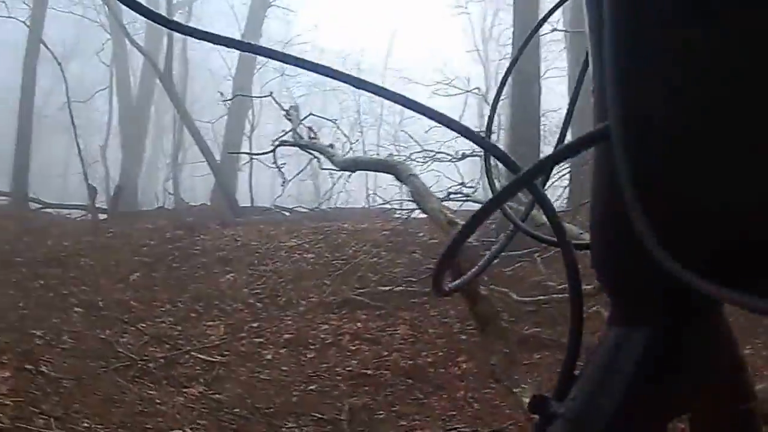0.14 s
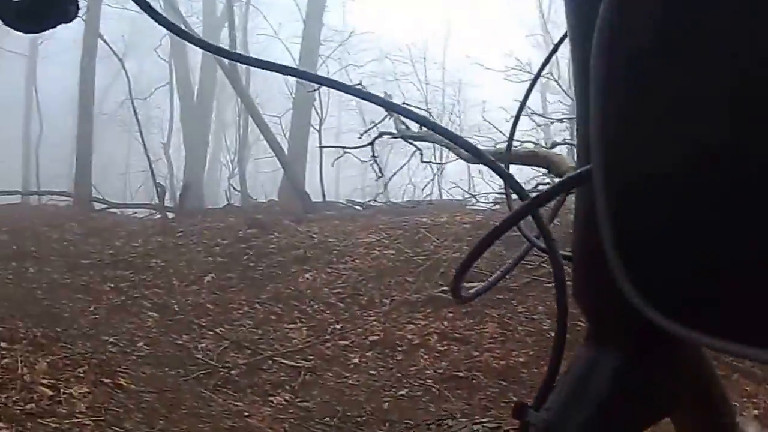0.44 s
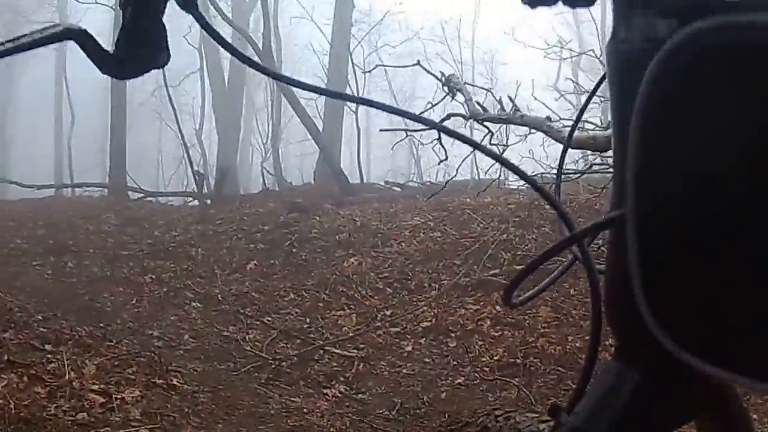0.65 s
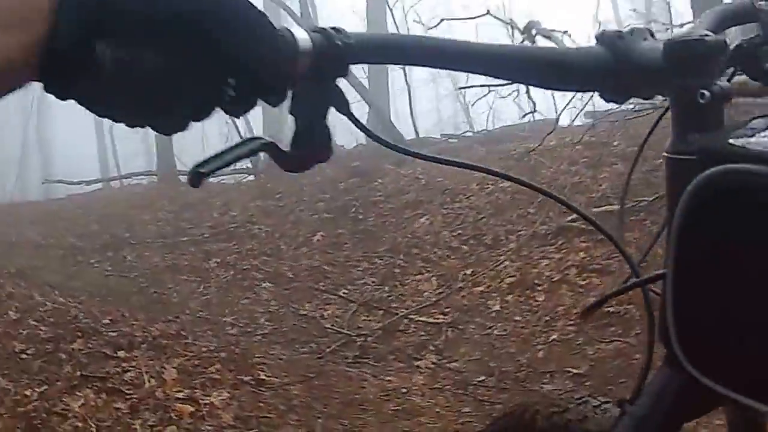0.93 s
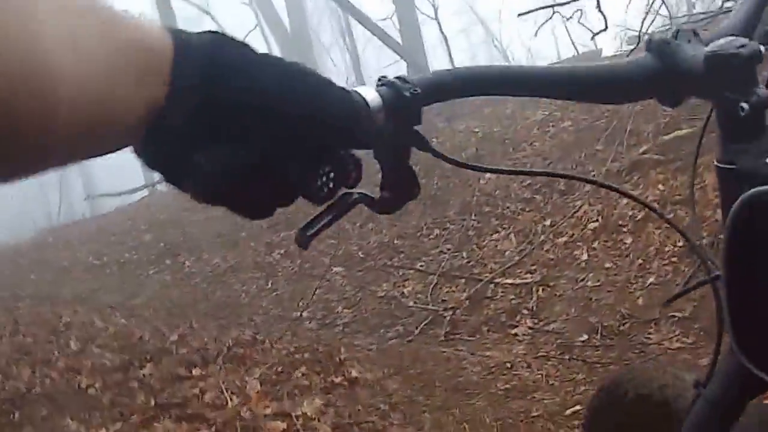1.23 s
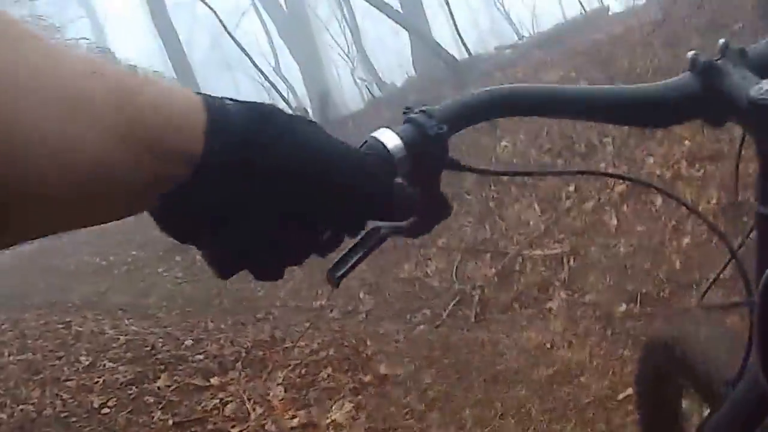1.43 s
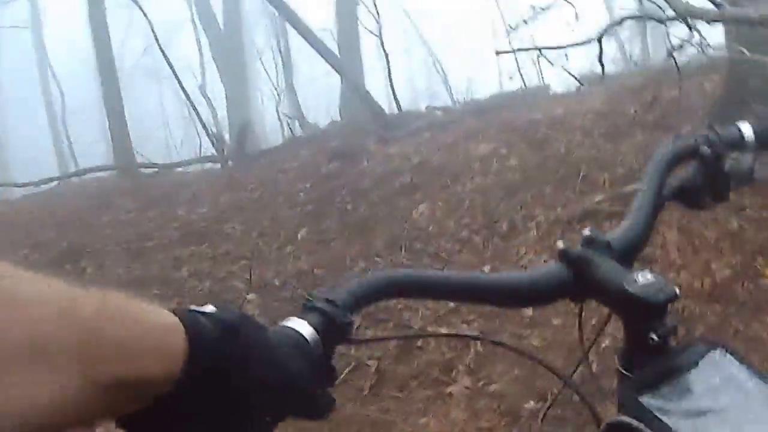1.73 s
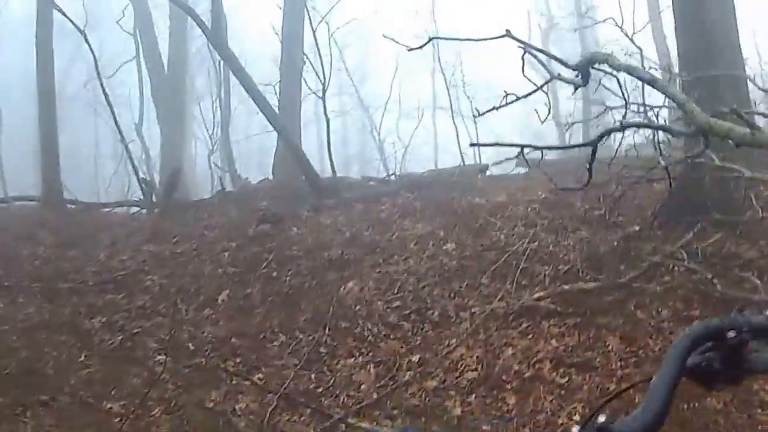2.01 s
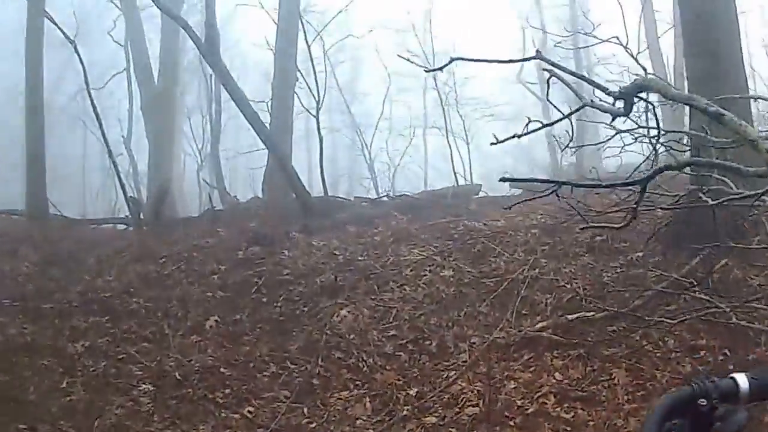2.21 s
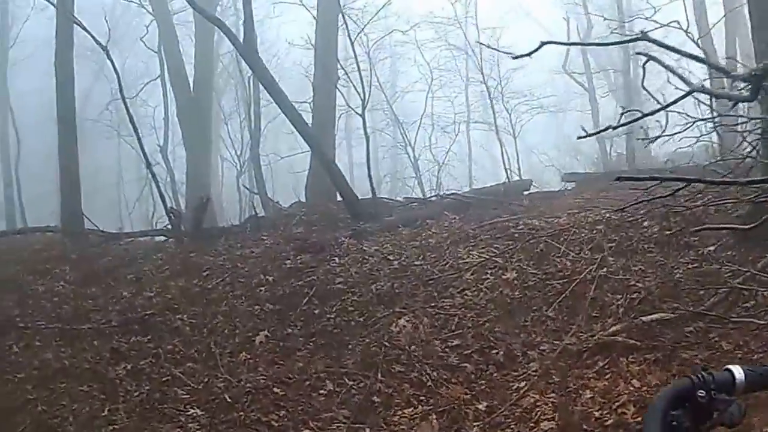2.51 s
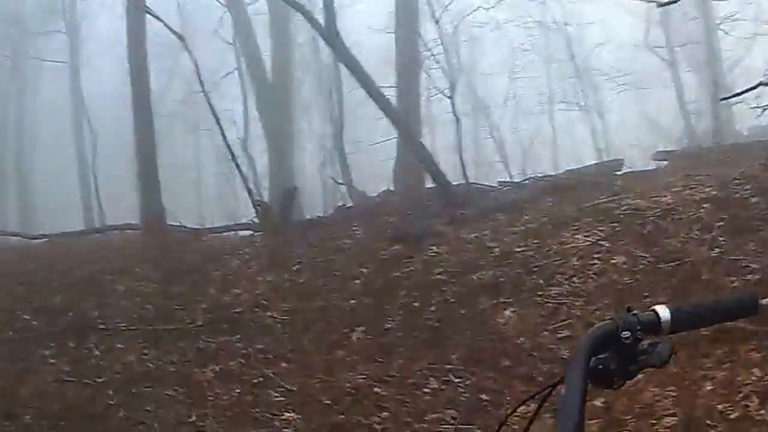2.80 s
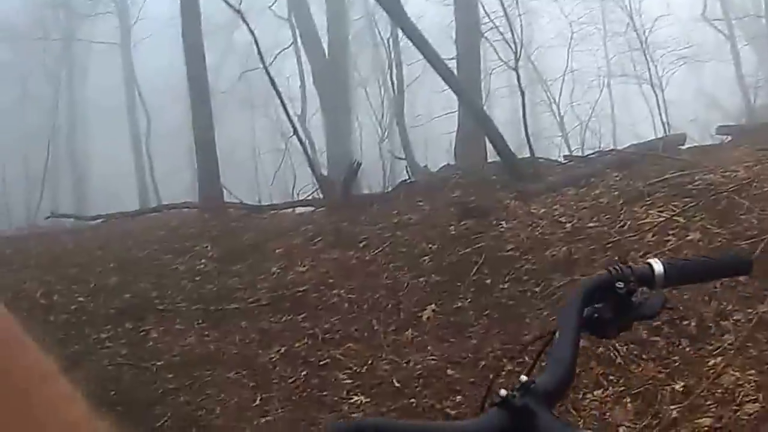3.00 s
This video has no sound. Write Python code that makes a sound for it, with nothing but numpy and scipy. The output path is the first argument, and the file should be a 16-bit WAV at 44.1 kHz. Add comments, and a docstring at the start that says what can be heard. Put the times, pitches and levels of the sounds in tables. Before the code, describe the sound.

Bike knocks heard through a sealed camera housing: loud opening clatter, quiet rustle, few later clacks

```python
"""Mountain bike ride heard inside a sealed housing

A small camera in a sealed plastic housing rides with a mountain bike through a leafy forest.
Knocks and a dense rustle of tyres, leaves and clothing ring the few short modes of the housing, which dulls them.
Knocks also add low thumps and bright noise cracks; band noise makes faint squeaks.
Low-passed noise makes the rumble of wind and hard jolts, shaped noise the thin microphone hiss."""
import sys
import numpy as np
from scipy import signal
from scipy.fft import rfft, irfft
from scipy.io import wavfile
from scipy.ndimage import uniform_filter1d, minimum_filter1d

SR = 44100
rng = np.random.default_rng(int(sys.argv[2]) if len(sys.argv) > 2 else 0)


def wrap_up_sound(samples):
    """Save the sound to the file named by the first command line argument, as 16-bit audio."""
    columns = np.atleast_2d(samples).T
    # keep every value between -1 and 1, then stretch to whole-number steps
    tamed = np.clip(columns, -1, 1)
    steps = np.round(tamed * 32767).astype(np.int16)
    wavfile.write(sys.argv[1], SR, steps)


N = 138915

# housing modes, four families: pitch_hz, level_db, t60_s
BODY_MODES = [(426, 5, 0.0064), (540, 0, 0.0089), (667, 3, 0.019)]
LOW_MODES = [(982, -10.5, 0.021), (1352.5, 14, 0.03), (1460, 12, 0.018)]
MID_MODES = [(1908, 0, 0.024), (2018, 0, 0.022), (2154, -3, 0.014)]
HIGH_MODES = [(2640, -1.5, 0.01), (2880, -5.5, .04), (3160, 2.5, 0.0086), (3890, -15, 0.0084),
              (4720, -17, 0.00712)]
# pass bands of the mid, low, high and body families: bottom_hz, top_hz
FAMILY_BANDS_HZ = [(1420, 2513), (970, 2000), (2580, 5200), (250, 1010)]
# knocks: start_s, mid_peak_db, lean_db (added to top mid mode re bottom one),
# low_re_mid_db, high_re_mid_db, body_re_mid_db, chatter_s
KNOCKS = [(0.0196, -14.5, -28, 1, -38, -25.5, 0.0012), (0.0312, -22.5, -19, -3, -28, -36, 0.0018),
          (0.045, -23.5, 3, -2, -12, -32, 0.0097), (0.0562, -41.5, -13, -3, -7, 6, 0.0087),
          (0.0663, -16, 14, -2.5, 11, -1.5, 0.0038), (0.0685, -4, -22.5, -3.5, -12, -19, 0.0028),
          (0.0779, -17.5, -14, 2, -9.5, -29, 0.002), (0.0791, -9.5, -26, -16, -25, -37, 0.0017),
          (0.098, -31.5, 0, 7.5, -8.5, -33, 0.00135), (0.1027, -33, 12.5, 1, -17, -26, 0.001),
          (0.119, -43.5, -5, 4, -10, -28, 0.0035), (0.138, -31, 10, -0.5, -8, -34, 0.007),
          (0.2001, -34.5, 3, -6, -11, -25, 0.0017), (0.378, -40.5, -11, -9, -20, -37, 0.0014),
          (0.7007, -39.5, 23, -14, -10, -37.5, 0.0011), (0.7615, -31, 7, -18, -11, -40.5, 0.0042),
          (0.7871, -45.5, 23, -10, -12, -32.5, 0.0017), (0.9207, -38, -1, -9, -9.5, -33, 0.0012),
          (0.9494, -41, 16, -8, -11, -46, 0.0017), (0.964, -35.5, -14, -10, -12.5, -44, 0.0015),
          (0.989, -37.5, -8, -13, -8.5, -36, 0.0015), (1.128, -50.5, -14.5, -0.5, -2, -25, 0.0014),
          (1.2131, -43, -16, -2, -4, -28, 0.0048), (1.2501, -42, -16, -9.5, -11.5, -23, 0.0017),
          (1.5844, -40.5, -3, -14, -22.5, -27, 0.005), (1.6932, -37, 7, -39, -12, -25, 0.012),
          (1.7056, -36.5, -25, -11.5, -10, -37, 0.0055), (1.8135, -42.5, -4.5, -23.5, -18, -24, 0.0012),
          (1.8251, -39, 1.5, -17.5, -14, -28.5, 0.0022), (1.999, -19.5, -7.5, -4.5, -37, -43, 0.00031),
          (2.0765, -16.5, 3, -5.5, -32.5, -45.5, 0.00031), (2.9624, -48, 12, 2, -5.5, -4.5, 0.00097),
          (2.9701, -36.5, 15.5, -14.5, -4, -27.5, 0.004), (2.974, -22, 6.5, -15.5, -4, -44.5, 0.0054),
          (2.9767, -14, 5, -14.5, -5.5, -52, 0.002), (2.9809, -26, 7, -13.5, -4, -42, 0.0031),
          (2.986, -25, 5.5, -19.5, -12.5, -31.5, 0.0053), (3.0151, -45, 16, -12.5, -16.5, -35, 0.0015),
          (3.109, -46, 14, -21, -2.5, -30, 0.0012)]
# rustle: time_s, mid_level_db, low_re_mid_db, high_re_mid_db, body_re_mid_db
RUSTLE = [(0.0, -28, -6, -16.5, -33.5), (0.046, -39.5, 12, -12.5, -31), (0.074, -40.5, -3, -13, -23),
          (0.114, -51, -4.5, -9, -21), (0.142, -48.5, -4, -4, -18.5), (0.174, -59, -9, -9, -21),
          (0.231, -56, 2.5, -3, -22), (0.325, -49, -11, -9, -18.5), (0.347, -44.5, -9, -11.5, -17),
          (0.397, -58.5, -1, -7.5, -19), (0.539, -59, -8, -4.5, -16), (0.593, -64.5, -2, -2, -16.5),
          (0.643, -58, -3, -5, -21), (0.77, -58, -5, -7, -30.5), (0.854, -63, -5, -5, -18.5),
          (0.966, -56.5, -7.5, -8, -23), (1.068, -58, -12, -7, -21.5), (1.109, -64, 0, -4.5, -19),
          (1.199, -52.5, -8, -6.5, -22), (1.257, -51, -6.5, -14.5, -30), (1.341, -57, -8.5, -5, -20.5),
          (1.423, -48, -11, -9.5, -22), (1.515, -60.5, -8.5, -7, -22), (1.58, -49, -18, -7, -27),
          (1.63, -57, -4.5, -9.5, -23), (1.704, -46.5, -7, -4, -25), (1.76, -56.5, -10.5, -8, -20),
          (1.818, -42, -15.5, -8, -29.5), (1.836, -43.5, -26, -9, -34.5), (1.86, -63.5, -3, -5, -17.5),
          (1.88, -60.5, -8, -6, -21.5), (1.924, -56.5, -5.5, -9, -23), (2.031, -61, -9.5, -4, -16),
          (2.081, -54, -11, -9, -21), (2.163, -64.5, -6.5, -4, -20), (2.343, -62, -6.5, -6.5, -21),
          (2.411, -57, -9.5, -9.5, -22.5), (2.48, -61.5, -8, -7, -21.5), (2.616, -62.5, -8, -6, -22.5),
          (2.666, -57, -14, -6.5, -23.5), (2.734, -66.5, -5, -0.5, -21), (2.804, -62.5, -8, -4, -19.5),
          (2.935, -64, -5.5, -5.5, -22.5), (2.957, -60.5, -9, -5, -23.5), (2.983, -60, -2, -9, -30),
          (3.017, -61, -8.5, -8, -22), (3.149, -64, -4.5, -4, -21)]
# faint squeaks: start_s
SQUEAK_STARTS_S = [.731, .745, .781, .803, .817]
# low rumble of wind and hard jolts: time_s, level_db
RUMBLE_LEVELS = [(0.0, -62), (0.03, -84), (0.06, -54), (0.07, -45), (0.11, -71.5), (0.28, -86),
                 (0.42, -73.5), (0.84, -82), (1.35, -79), (1.41, -70), (1.53, -89), (1.58, -69.5),
                 (1.63, -90), (1.68, -67.5), (1.77, -79), (1.83, -82.5), (2.46, -84), (2.52, -97),
                 (2.56, -70), (2.59, -92.5), (2.95, -90.5), (3.15, -92.5)]
# microphone hiss spectrum: pitch_hz, density_db (per Hz, relative)
HISS_SPECTRUM = [(100, -7.5), (400, -9.5), (1000, -8.5), (5000, -5.5), (6500, -10.5), (8000, -24.5),
                 (9300, -1.5), (11000, 2), (13500, 2), (15000, -6.5)]

HOUSING_CUT_HZ = 4790
HIGH_LEAN_SHARE = 0.7
CHATTER_GAIN, FAMILY_SCATTER_DB = 0.07, 0.7  # chatter re a first push of 1
THUMP_DB, THUMP_HZ, THUMP_T60_S, THUMP_POWER = -3.5, 103, 0.0091, 1.455
CRACK_DB, CRACK_POWER, CRACK_HIGHPASS_HZ, CRACK_LOWPASS_HZ = -22.5, 1.5, 9300, 11250
LEAK_DB, LEAK_BAND_HZ = -9, (4800, 7000)  # share of the crack below the treble dip
RUSTLE_DAMPING, RUSTLE_CUT_HZ = 1.5, 4200
GRAINS_PER_S, GRAIN_SPREAD_DB = 7000, 1.5
SHARED_FLICKER_DB, OWN_FLICKER_DB, FLICKER_PER_S = 0.5, 1.5, 70
SQUEAK_BAND_HZ, SQUEAK_S, SQUEAK_DB = (4020, 4300), 0.009, -67
RUMBLE_HZ, RUMBLE_FLICKER_DB, RUMBLE_FLICKER_PER_S = 38.07, 5, 13
HISS_DB = -84.5
LIMIT_DB, LIMIT_S = -3.3, 0.0011
TOP_HZ = 15750


def undb(db):
    """Amplitude of a level in dB."""
    return 10 ** (np.asarray(db) / 20)


def unit(x):
    """Scale to RMS 1."""
    return x / np.sqrt(np.mean(x ** 2))


def peak_unit(x):
    """Scale to peak 1."""
    return x / np.abs(x).max()


def filt(x, hz, kind, order):
    """Butterworth filter."""
    return signal.sosfilt(signal.butter(order, hz, kind, fs=SR, output="sos"), x)


def walk(rate_per_s):
    """Random levels, each held 1 / rate_per_s and slewed; RMS 1."""
    hold = int(SR / rate_per_s)
    steps = np.repeat(rng.standard_normal(N // hold + 1), hold)
    return unit(uniform_filter1d(steps, hold)[:N])


def curve(table, column):
    """Table column interpolated over the scene."""
    rows = np.array(table)
    return np.interp(np.arange(N) / SR, rows[:, 0], rows[:, column])


def ring(modes, damping=1):
    """Click response of a family: decaying sines, t60 divided by damping."""
    t_s = np.arange(SR // 16) / SR
    response = 0
    for hz, db, t60_s in modes:
        decay = np.exp(-np.log(1000) * damping * t_s / t60_s)
        response = response + undb(db) * np.sin(2 * np.pi * hz * t_s) * decay
    return response


def housing_families(damping=1, lean_db=0):
    """Click responses of mid, low, high and body modes, band-limited; lean tilts mid and high."""
    mid_lean = (-0.5, 0, 0.5)
    high_lean = HIGH_LEAN_SHARE * np.array((0, -0.91, 0.5, 0, 0))
    mid = [(hz, db + k * lean_db, t60_s) for k, (hz, db, t60_s) in zip(mid_lean, MID_MODES)]
    high = [(hz, db + k * lean_db, t60_s) for k, (hz, db, t60_s) in zip(high_lean, HIGH_MODES)]
    families = (mid, LOW_MODES, high, BODY_MODES)
    return [filt(ring(modes, damping), band_hz, "band", order=3)
            for modes, band_hz in zip(families, FAMILY_BANDS_HZ)]


def knocks():
    """Blow plus short chatter rings the modes; thump and noise crack grow faster than the knock."""
    thump = -ring([(THUMP_HZ, 0, THUMP_T60_S)])
    t_s = np.arange(SR // 40) / SR
    ringing, crack = np.zeros(N + SR), np.zeros(N + SR)
    for start_s, mid_db, lean_db, low_db, high_db, body_db, chatter_s in KNOCKS:
        start = int(start_s * SR)
        scatter_db = FAMILY_SCATTER_DB * rng.standard_normal(5)
        hold = 1 / (1 + (t_s / max(chatter_s, 1 / SR)) ** 4)
        chatter = rng.standard_normal(len(t_s)) * hold
        push = CHATTER_GAIN * chatter
        push[0] = 1  # the blow
        thump_db = THUMP_DB + THUMP_POWER * (mid_db + body_db)
        levels_db = np.array([mid_db, mid_db + low_db, mid_db + high_db, mid_db + body_db, thump_db])
        gains = undb(levels_db + scatter_db)
        responses = housing_families(lean_db=lean_db) + [thump]
        sound = sum(gain * peak_unit(signal.fftconvolve(push, response))
                    for gain, response in zip(gains, responses))
        ringing[start:start + len(sound)] += sound
        crack[start:start + len(t_s)] += chatter * undb(CRACK_DB + CRACK_POWER * (mid_db + high_db))
    return ringing[:N], crack[:N]


def rustle():
    """Dense grains of uneven size ring the same modes, damped by the touch."""
    out = 0
    shared_flicker = SHARED_FLICKER_DB * walk(FLICKER_PER_S)
    hit = rng.random(N) < GRAINS_PER_S / SR
    size = hit * undb(GRAIN_SPREAD_DB * rng.exponential(size=N))
    for family, response in enumerate(housing_families(RUSTLE_DAMPING)):
        grains = signal.fftconvolve(size * rng.standard_normal(N), response)[:N]
        level_db = curve(RUSTLE, 1) + shared_flicker
        if family > 0:  # the others are relative to mid
            level_db = level_db + curve(RUSTLE, family + 1)
        level_db = level_db + OWN_FLICKER_DB * walk(FLICKER_PER_S / 2)
        out = out + undb(level_db) * unit(grains)
    return filt(out, RUSTLE_CUT_HZ, "low", order=3)


def squeaks():
    """Short breathy whistles of rubbing: narrow-band noise in bell-shaped bursts."""
    t_s = np.arange(N) / SR
    shape = sum(np.exp(-(2 * (t_s - start_s) / SQUEAK_S - 1) ** 2) for start_s in SQUEAK_STARTS_S)
    whistle = unit(filt(rng.standard_normal(N), SQUEAK_BAND_HZ, "band", order=2))
    return shape * undb(SQUEAK_DB) * whistle


def rumble():
    """Low rumble of wind and hard jolts: low-passed noise with a flickering level."""
    noise = filt(rng.standard_normal(N), RUMBLE_HZ, "low", order=1)
    noise = unit(filt(noise, 7.8, "high", order=2))
    level_db = curve(RUMBLE_LEVELS, 1) + RUMBLE_FLICKER_DB * walk(RUMBLE_FLICKER_PER_S)
    return filt(noise, 130, "low", order=1) * undb(level_db)


def hiss():
    """Steady microphone self-noise: white noise shaped in frequency."""
    hz, density_db = np.array(HISS_SPECTRUM).T
    bins_hz = np.arange(N // 2 + 1) * SR / N + 1  # +1 avoids log(0)
    shape = undb(np.interp(np.log(bins_hz), np.log(hz), density_db))
    return undb(HISS_DB) * unit(irfft(rfft(rng.standard_normal(N)) * shape, N))


def scene():
    """Sounds dulled by the housing, plus cracks, rumble and hiss."""
    ringing, crack = knocks()
    inside = filt(ringing + rustle() + squeaks(), HOUSING_CUT_HZ, "low", order=6)
    leak = undb(LEAK_DB) * filt(crack, LEAK_BAND_HZ, "band", order=4)
    bright = filt(crack, CRACK_HIGHPASS_HZ, "high", order=10)
    bright = filt(bright, CRACK_LOWPASS_HZ, "low", order=1)
    return (inside + leak + bright + rumble() + hiss())[None]


def record(dry):
    """A quick limiter holds peaks above LIMIT_DB; the recorder cuts the top."""
    span = int(LIMIT_S * SR)
    peaks = -minimum_filter1d(-np.abs(dry), 2 * span)  # running maximum
    envelope = uniform_filter1d(peaks, span)
    held = dry * np.minimum(1, undb(LIMIT_DB) / envelope)
    return signal.sosfilt(signal.ellip(8, 0.2, 70, TOP_HZ, fs=SR, output="sos"), held)


dry = scene()
out = record(dry)
wrap_up_sound(out)
```